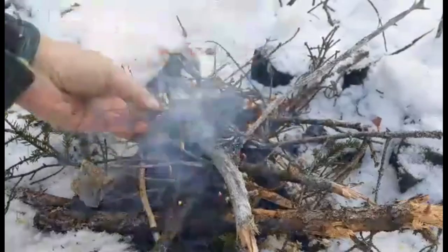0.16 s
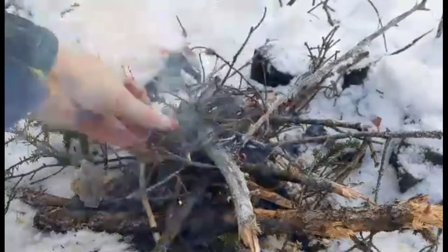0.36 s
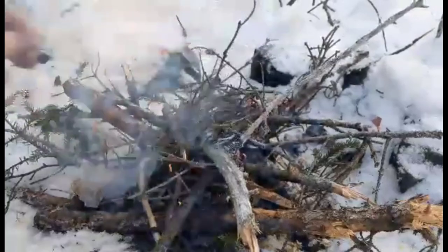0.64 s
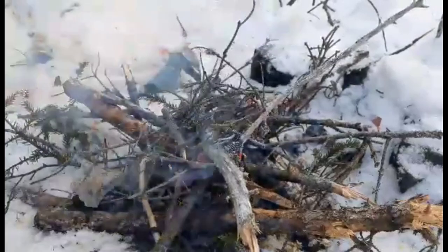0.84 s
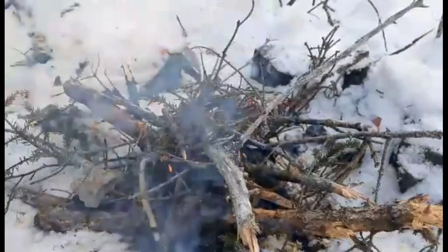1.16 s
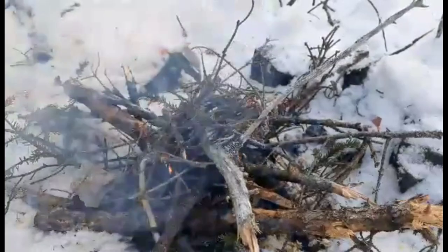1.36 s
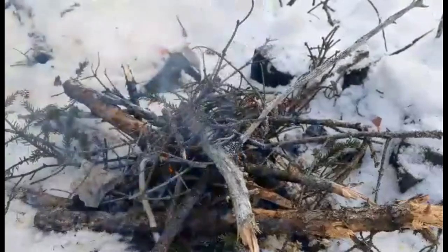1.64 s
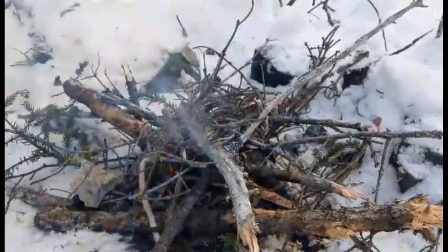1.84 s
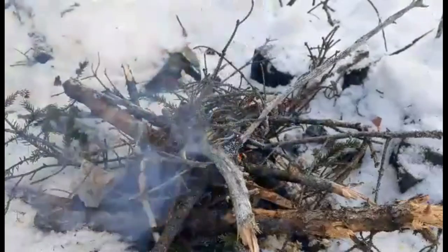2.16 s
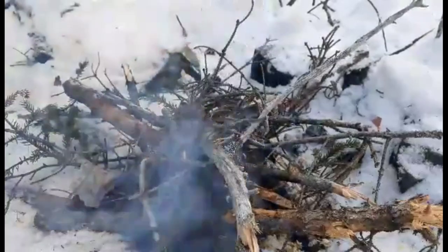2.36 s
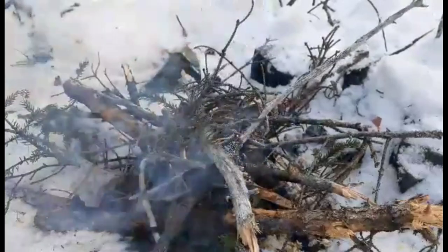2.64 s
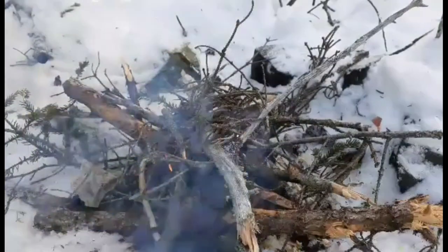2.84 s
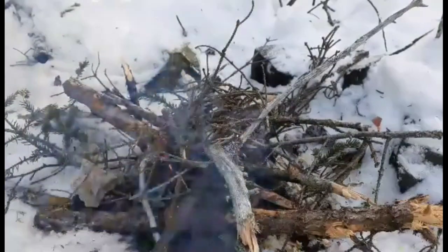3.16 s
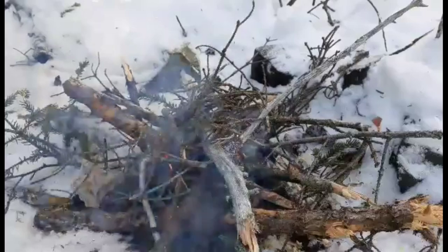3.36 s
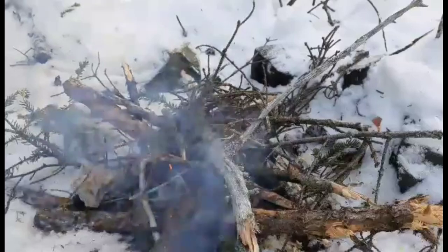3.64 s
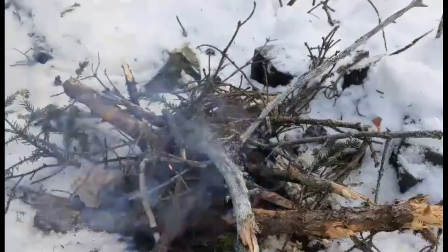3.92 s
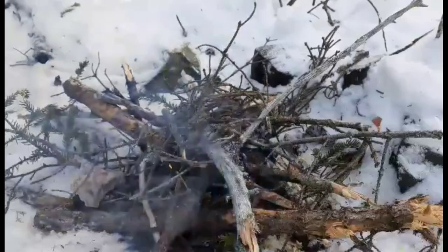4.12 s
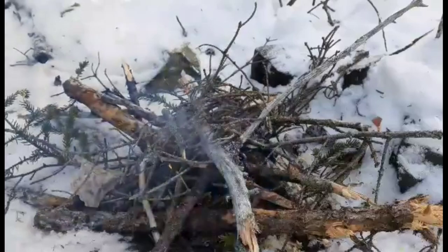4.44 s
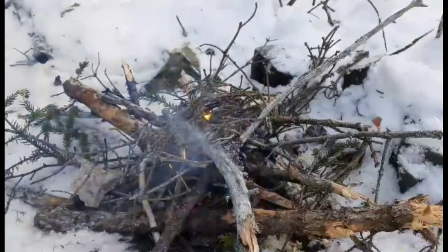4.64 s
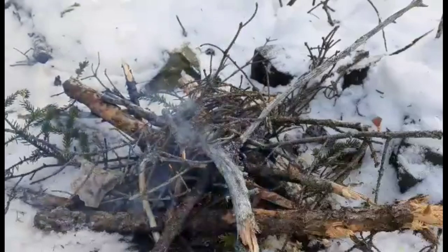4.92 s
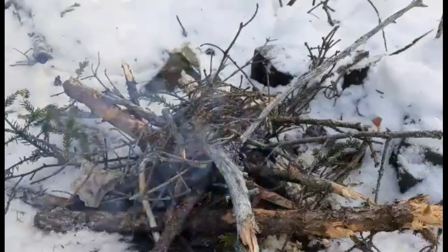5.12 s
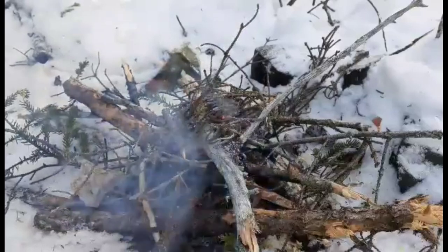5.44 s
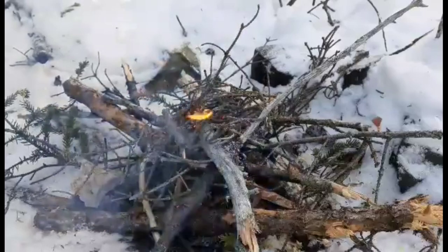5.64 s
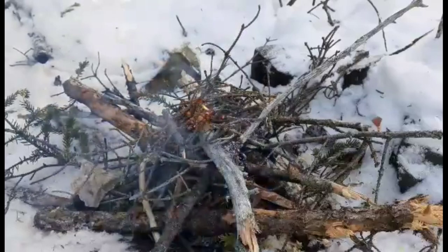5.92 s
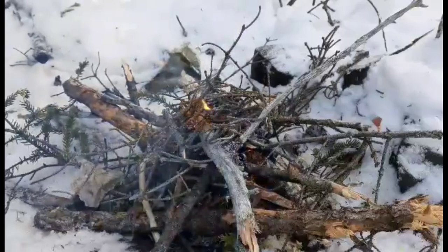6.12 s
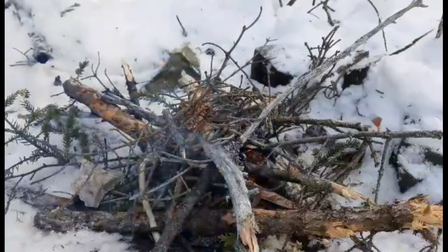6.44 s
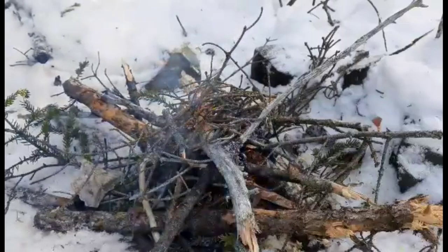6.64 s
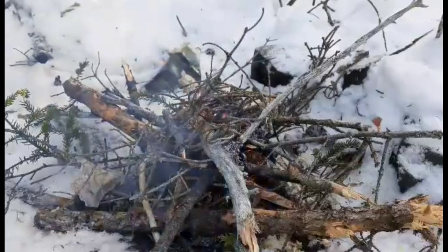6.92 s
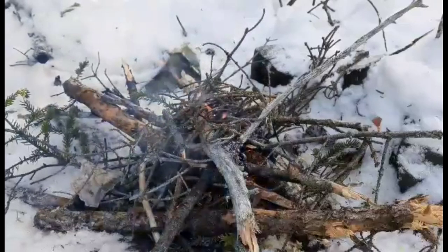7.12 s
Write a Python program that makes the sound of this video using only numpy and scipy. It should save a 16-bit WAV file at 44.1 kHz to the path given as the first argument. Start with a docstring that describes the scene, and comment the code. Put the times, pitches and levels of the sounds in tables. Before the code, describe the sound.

On the left, a winter jacket rubs in several bright strokes, loudest around two seconds, while snow gives way underfoot in dull thuds and small crunches. The twig fire ticks and pops irregularly; later its cracks become sharper and much louder, each trailing a brief fizz of steam. Microphones are very near, the surroundings quiet and dry.

```python
"""Twig fire in the snow

A small fire close to two microphones: twigs pop as short cracks of noise with a ring, vent jets of hiss,
and once whistle as a rising sine. On the left a stiff winter jacket swishes as noise; packed snow
gives way under a shifting weight in soft low thuds, creaking noise and runs of small crunches.
Sounds from the left reach the right microphone later, duller and weaker."""
import sys
import numpy as np
from scipy import signal
from scipy.fft import rfft, irfft, next_fast_len
from scipy.io import wavfile
from scipy.ndimage import uniform_filter1d, map_coordinates

SR = 44100
rng = np.random.default_rng(int(sys.argv[2]) if len(sys.argv) > 2 else 0)


def linear_from_db(decibels):
    """Turn decibels (scalar or array-like) into linear amplitude factors; 0 gives 1."""
    return 10 ** (np.asarray(decibels, float) / 20)


def log_audio(samples):
    """Write samples as a 16-bit WAV file to the path given in sys.argv[1]."""
    # one column per channel
    frames = np.atleast_2d(samples).T
    # limit to full scale, then quantise
    limited = np.clip(frames, -1, 1)
    pcm = np.round(limited * 32767).astype(np.int16)
    wavfile.write(sys.argv[1], SR, pcm)


N = 320607

# Twig pops: time_s (1 ms ahead of the peak), crack_db, ring_hz,
# side_tenths (10 = left, 0 = ahead, negative = right), burst_ms (fade by a factor e)
TWIG_POPS = [(0.0195, -38, 2000, 3, .5), (0.3878, -33, 11000, 3, .5), (0.563, -40, 8000, 5.5, .6),
             (0.757, -28, 2800, 7, .8), (1.0778, -24, 1500, 7, .3), (1.1681, -25, 2500, 7, .8),
             (1.2323, -27, 5000, 6.5, .3), (1.3206, -26, 8000, 4, .5), (3.4357, -23, 9000, 8, .6),
             (3.4614, -15, 10000, 8, .7), (3.4805, -27, 11000, 8, .7), (4.1162, -6, 12000, 11.5, 1.1),
             (4.15, -18, 7000, 7, .5), (4.2273, -36, 2200, 9, 1.5), (4.9661, -36, 10500, 5, .7),
             (5.0289, -39, 11500, 9, .5), (5.1765, -10.5, 6500, 8.5, 1), (6.0388, -38, 12000, 2, .6),
             (6.0997, -29, 8000, -2, .7), (6.136, -19, 1500, 3, .3), (6.158, -19, 11000, 5.5, 1.2),
             (6.4184, -41, 1500, 3, .5), (6.5115, -37, 1200, 7, .5), (6.5545, -29, 1800, 6, .5),
             (6.5863, -21, 12000, 12, 1.3), (6.944, -16, 8000, 8, 1.4), (7.001, -12, 2400, 9, 1.5),
             (7.051, -22, 12000, 12, .4), (7.2165, -33, 7600, 3, .5)]
# Sap boiling out of a narrowing crack: time_s, pitch_hz, level_db
SAP_WHISTLE = [(3.41, 1700, -48), (3.445, 2200, -38), (3.453, 3900, -38), (3.457, 4200, -21),
               (3.459, 5000, -38), (3.4625, 7800, -28)]
# Steam venting from a burst twig: start_s, fizz_db, fade_20db_s, body_over_fizz_db
STEAM_JETS = [(4.12, -32.0, 0.05, -18), (4.151, -41.0, 0.119, -15.5), (4.228, -42.5, 0.105, -13.0),
              (5.184, -30, 0.075, -28), (6.102, -47.0, 0.148, -14.0), (6.15, -34.0, 0.065, -9),
              (6.588, -46.0, 0.123, -12.0), (6.954, -33, 0.06, -20.0), (7.011, -38, 0.1, -11.0)]
# Strokes of cloth on cloth: peak_s, fizz_db, rise_20db_s, fade_20db_s, body_over_fizz_db
CLOTH_STROKES = [(0, -48.5, 0.1, 0.175, -14.0), (0.148, -56.5, 0.299, 1.059, -20.0),
                 (0.765, -38, 0.21, 0.5, -14.0), (1.03, -39.5, 0.1, 0.62, -10),
                 (1.269, -31.5, 0.055, 0.012, -14.0), (1.62, -24.5, 0.085, 0.12, -12),
                 (1.68, -26, 0.1, 0.085, -18), (1.898, -35.0, 0.112, 0.149, -11.5),
                 (2.067, -21.5, 0.125, 0.17, -18.5), (2.509, -53.5, 0.632, 0.4, -6.0),
                 (2.847, -48.5, 0.09, 0.103, -6.5), (3.077, -51.0, 0.236, 0.581, -2.5),
                 (3.458, -31, 0.12, 0.01, -11), (3.49, -45, 0.25, 0.3, -10),
                 (4.38, -51.5, 0.465, 0.455, -9.0), (4.893, -55.0, 0.051, 0.196, -9.5),
                 (4.975, -49.5, 0.036, 0.026, -14.5), (5.412, -58.0, 0.008, 0.167, -1.0),
                 (5.522, -48.0, 0.131, 0.125, -20.0), (5.835, -52.0, 0.158, 0.225, -16.5),
                 (6.557, -52.5, 0.299, 0.191, -8.0), (6.732, -53.5, 0.144, 0.17, -16.5),
                 (7.2, -55, 0.35, 0.5, -15.5)]
# Low pushes of snow giving way: start_s, peak_db, pitch_hz
SNOW_THUDS = [(1.269, -32.5, 109), (1.829, -41, 130), (1.865, -40, 135), (1.922, -34.5, 133),
              (1.974, -33.5, 114), (2.428, -47, 200), (2.826, -33, 106), (3.083, -41, 95),
              (3.118, -39, 150), (3.232, -39, 125), (3.265, -40, 110), (3.31, -40, 120), (3.355, -41, 120),
              (4.151, -35, 85), (4.428, -43.5, 135)]
# Snow giving way gradually: peak_s, level_db, rise_20db_s, fade_20db_s
SNOW_SETTLES = [(0, -49, 0.05, 0.184), (1.116, -56.5, 0.054, 0.197), (1.271, -46.0, 0.086, 0.114),
                (1.651, -57.5, 0.096, 0.419), (1.9, -50, 0.339, 0.4), (2.85, -50, 0.1, 0.08),
                (3.12, -52, 0.16, 0.09), (3.42, -48, 0.4, 0.3), (4.436, -56.5, 0.205, 0.105),
                (5.87, -62.0, 0.228, 0.44), (6.14, -44.5, 0.05, 0.08), (6.52, -59.5, 0.202, 0.848),
                (7.051, -57, 0.347, 0.208)]
# Crust breaking at once: peak_s, level_db, fade_20db_s
CRUST_COLLAPSES = [(2.731, -45, 0.11), (3.034, -51, 0.2), (3.872, -51, 0.12), (4.151, -53, 0.161),
                   (5.175, -54, 0.161), (5.412, -55, 0.166), (6.101, -52, 0.1)]
# Crust crunching in quick runs of small breaks: start_s, length_s, level_db, middle_pitch_hz
CRUST_CRUNCHES = [(2.726, .045, -49, 300), (3.868, .05, -51, 300), (5.409, .045, -44, 520),
                  (6.205, .009, -35, 350), (6.22, .01, -39, 500)]
# Relative spectra of bright fizz, duller body and snow rumble: frequency_hz, gain_db
FIZZ_SPECTRUM = [(1180, -31), (2000, -22), (2940, -16), (3950, -5), (4810, -6), (7690, -3.5), (13000, 0)]
BODY_SPECTRUM = [(260, -11), (450, -5), (1810, -6), (2800, -7.5), (3640, -14), (6160, -120)]
SNOW_SPECTRUM = [(24, -51), (45, -10), (69, -1), (129, -2.5), (495, -16), (1600, -34), (3000, -120)]
# Left over right level of a source on the left: frequency_hz, level_db
LEFT_SHADOW = [(100, 6.5), (4000, 4.5), (13000, 11.5)]
# Amplitude share common to both microphones: frequency_hz, share_0_to_1
COMMON_SHARE = [(100, 0.97), (1500, 0.64), (4000, 0.05), (9000, 0.32)]

LAG_S = 22 / SR  # left to right microphone
TOP_HZ = 13060
STROKE_ROUND, SETTLE_ROUND = 1.3, 1.05  # swell shape in dB: 1 pointed, 2 domed
REST_FIZZ_DB, REST_BODY_DB, REST_SNOW_DB = -68, -82, -74.5  # faint rustle and creak between moves
JET_RISE_20DB_S, COLLAPSE_RISE_20DB_S = .003, .007
TICKS, TICK_LEAST_DB, TICK_SPREAD_DB = 70, -56, 2.5
SNAP = .6  # single click at the rupture, relative to the crack's peak
BREAKS = 9  # per crunch


def unit(x):
    """Scale to rms 1."""
    return x / np.sqrt(np.mean(x ** 2) + 1e-20)


def along(points, hz):
    """Interpolate (Hz, value) points on a log frequency axis."""
    f, v = np.transpose(points)
    return np.interp(np.log(hz + 1), np.log(f + 1), v)


def wobble(rate_hz):
    """Smooth random curve with rate_hz knots a second."""
    knots = rng.standard_normal(int(N * rate_hz / SR) + 4)
    return map_coordinates(knots, [np.arange(N) * rate_hz / SR])


def filtered(x, response):
    """Apply a complex response of frequency."""
    n = x.shape[-1]
    m = next_fast_len(n + 8192)
    return irfft(rfft(x, m) * response(np.fft.rfftfreq(m, 1 / SR)), m)[..., :n]


def from_left(pair, side=1):
    """Make two takes a stereo pair: partly alike, right late and shaded; side 0 = ahead."""
    near, other = pair

    def same(hz):
        return np.clip(along(COMMON_SHARE, hz), 0, 1)

    def late(hz):
        delay = np.exp(-2j * np.pi * hz * LAG_S * side)
        return delay / linear_from_db(side * along(LEFT_SHADOW, hz))

    shared = filtered(near, lambda hz: same(hz) * late(hz))
    separate = filtered(other, lambda hz: np.sqrt(1 - same(hz) ** 2) * late(hz))
    return np.array([near, shared + separate])


def swells(peak_s, level_db, rise_s, fall_s, roundness, rest_db):
    """Power of overlapping swells over a resting level, one value per sample."""
    grid_s = np.arange(0, N / SR + .002, .001)
    u = grid_s - peak_s[:, None]
    away = np.where(u < 0, -u / rise_s[:, None], u / fall_s[:, None])
    each = linear_from_db(level_db[:, None] - 20 * away ** roundness) ** 2
    power = each.sum(axis=0) + linear_from_db(rest_db) ** 2
    return np.interp(np.arange(N) / SR, grid_s, power)


def uneven_noise(spectrum, strength_db, strength_rate_hz, uneven_db):
    """Two takes of rms 1 noise with uneven spectral patches and smooth random changes in strength."""
    z = signal.stft(rng.standard_normal((2, N)), nperseg=512)[2]
    field = uniform_filter1d(rng.standard_normal(z.shape[1:]), size=5, axis=0)
    field = uniform_filter1d(field, size=6, axis=1)
    uneven = signal.istft(z * linear_from_db(uneven_db * unit(field)), nperseg=512)[1][:, :N]
    varied = linear_from_db(strength_db * wobble(strength_rate_hz)) * uneven
    return unit(filtered(varied, lambda hz: linear_from_db(along(spectrum, hz))))


def dull_body(power, flutter_db):
    """Duller noise under a fizz, with the given flutter and a slower one of its own."""
    flutter = linear_from_db(flutter_db + 2.02 * wobble(20))
    noise = uneven_noise(BODY_SPECTRUM, strength_db=1.5, strength_rate_hz=270, uneven_db=1.5)
    return np.sqrt(power) * flutter * noise


def bark_ticks():
    """Faint ticks of bark at random moments, as extra rows of the pop table."""
    return [(.01 + when * N / SR, TICK_LEAST_DB - TICK_SPREAD_DB * np.log(size), TOP_HZ * pitch, 10 * pan, .2)
            for when, size, pitch, pan in rng.random((TICKS, 4))]


def pops():
    """A cell wall bursts: a jagged crack dies in a few ms and rings the twig; thin twigs crack thinner."""
    out = np.zeros((2, N + SR))
    ms = np.arange(SR // 20) / SR * 1000

    def bright(hz):  # the floor keeps some low body
        return linear_from_db(np.maximum(along(FIZZ_SPECTRUM, hz), -20)) * (hz < TOP_HZ)

    for time_s, crack_db, ring_hz, side_tenths, burst_ms in TWIG_POPS + bark_ticks():
        u = (ms - 3) / burst_ms
        burst = np.exp(np.where(u < 0, 1.4 * u, -u))
        twig = lambda hz: 1 / (1 + ((hz - ring_hz) / (600 + ring_hz / 10)) ** 2)
        thin = lambda hz: (hz + 900) / (hz + ring_hz)
        noise = rng.standard_normal((2, 2, len(ms)))
        jagged = unit(filtered(noise[0], lambda hz: bright(hz) * thin(hz)))
        ring = unit(filtered(noise[1], twig))
        crack = burst * (jagged + ring)
        crack /= abs(crack).max(axis=1, keepdims=True)
        crack -= SNAP * filtered(burst == burst.max(), thin)
        heard = from_left(crack, side=side_tenths / 10)
        out[:, round((time_s - .002) * SR):][:, :len(ms)] += linear_from_db(crack_db) * heard
    return out[:, :N]


def whistle():
    """Tone that climbs as the crack closes, until the twig bursts; rough and breathy below 3500 Hz."""
    time_s, pitch_hz, level_db = np.transpose(SAP_WHISTLE)
    t = np.arange(N) / SR
    pitch = np.interp(t, time_s, pitch_hz)
    level = linear_from_db(np.interp(t, time_s, level_db, -120, -120))
    breath = unit(1 + 1.6 * wobble(1600)) ** (pitch < 3500)
    tone = level * breath * np.sin(2 * np.pi * np.cumsum(pitch) / SR)
    return from_left([tone, tone])


def steam():
    """Steam vents from burst twigs: bright jets of uneven noise over a fluttering duller body."""
    start_s, fizz_db, fade_s, body_db = np.transpose(STEAM_JETS)
    rise_s = np.full_like(start_s, JET_RISE_20DB_S)
    bright = swells(start_s, fizz_db, rise_s, fade_s, 0.89, -120)
    dull = swells(start_s, fizz_db + body_db, rise_s, fade_s, 0.89, -120)
    noise = uneven_noise(FIZZ_SPECTRUM, strength_db=2.5, strength_rate_hz=450, uneven_db=4.5)
    fizz = np.sqrt(bright) * noise
    return from_left(fizz + dull_body(dull, 1.1 * wobble(40)))


def jacket():
    """Fibres slip over each other: a bright fizz and a duller body that flutter together."""
    peak_s, fizz_db, rise_s, fall_s, body_db = np.transpose(CLOTH_STROKES)
    bright = swells(peak_s, fizz_db, rise_s, fall_s, STROKE_ROUND, REST_FIZZ_DB)
    dull = swells(peak_s, fizz_db + body_db, rise_s, fall_s, STROKE_ROUND, REST_BODY_DB)
    flutter_db = 1.1 * wobble(40)
    noise = uneven_noise(FIZZ_SPECTRUM, strength_db=2.5, strength_rate_hz=900, uneven_db=2.6)
    fizz = np.sqrt(bright) * linear_from_db(flutter_db) * noise
    return from_left(fizz + dull_body(dull, flutter_db))


def snow():
    """Snow collapses in lumps: rumble, thuds and crunches; the weight moves from the left to the front."""
    lumps = creak() + thuds() + crunch()
    ahead = np.clip((np.arange(N) / SR - 4.6) / 0.49, 0, 1)
    front = from_left(lumps, side=0.29) * linear_from_db([[0], [-2.5]])
    return (1 - ahead) * from_left(lumps) + ahead * front


def thuds():
    """Each lump gives way in one low, quickly damped push."""
    out = np.zeros(N + SR)
    t = np.arange(SR // 8) / SR
    for start_s, peak_db, pitch_hz in SNOW_THUDS:
        envelope = (1 - np.exp(-t * pitch_hz / 0.094)) * np.exp(-t * pitch_hz / 0.58)
        push = -np.sin(2 * np.pi * pitch_hz * t) * envelope
        out[round(start_s * SR):][:len(t)] += linear_from_db(peak_db) * push / abs(push).max()
    return out[:N]


def creak():
    """Creaking rumble: low noise swells slowly as snow settles and quickly as crust collapses."""
    peak_s, level_db, fade_s = np.transpose(CRUST_COLLAPSES)
    rise_s = np.full_like(peak_s, COLLAPSE_RISE_20DB_S)
    sudden = swells(peak_s, level_db, rise_s, fade_s, SETTLE_ROUND, REST_SNOW_DB)
    gradual = swells(*np.transpose(SNOW_SETTLES), SETTLE_ROUND, -120)
    noise = uneven_noise(SNOW_SPECTRUM, strength_db=3, strength_rate_hz=45, uneven_db=2.0)
    return np.sqrt(sudden + gradual) * noise


def crunch():
    """Each break is a short push of its own pitch and size, unevenly spaced; the first is on time."""
    out = np.zeros(N + SR)
    t = np.arange(SR // 40) / SR
    for start_s, length_s, level_db, pitch_hz in CRUST_CRUNCHES:
        for k, (late, pitch, size) in enumerate(rng.standard_normal((BREAKS, 3))):
            cycles = t * pitch_hz * np.exp(.4 * pitch)
            break_s = start_s + length_s * (k + min(k, 1) * 0.29 * late) / BREAKS
            push = np.sin(2 * np.pi * cycles) * np.exp(-cycles / 0.64)
            out[round(break_s * SR):][:len(t)] -= linear_from_db(level_db + 2.8 * size - .6 * k) * push
    return out[:N]


def scene():
    """Sum fire, jacket and snow."""
    return pops() + whistle() + steam() + jacket() + snow()


def band_limit(x):
    """A steep low-pass at the top of the band."""
    return signal.sosfilt(signal.butter(12, 14360, fs=SR, output="sos"), x)


def record(dry):
    """The recorder cuts the deepest bass and drops 43 dB above its band limit."""
    def band(hz):
        return np.where(hz < TOP_HZ, 1, linear_from_db(-43)) / (1 + (40 / (hz + 1)) ** 4)

    mix = filtered(dry, band)
    return band_limit(mix)


dry = scene()
out = record(dry)
log_audio(out)
```